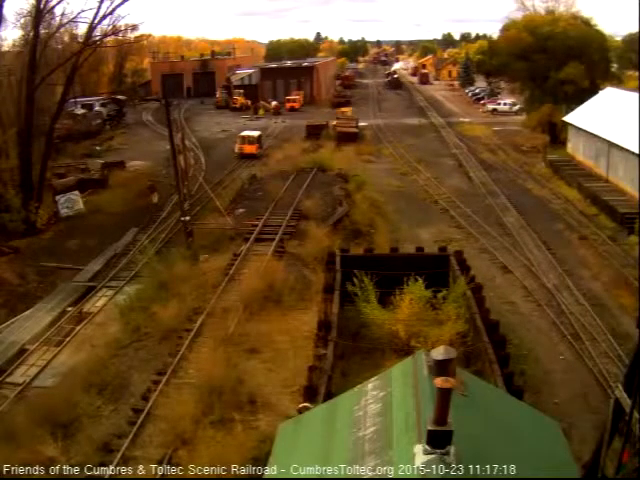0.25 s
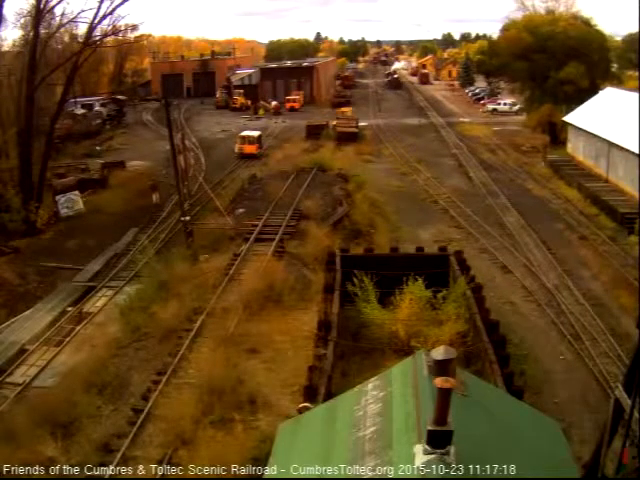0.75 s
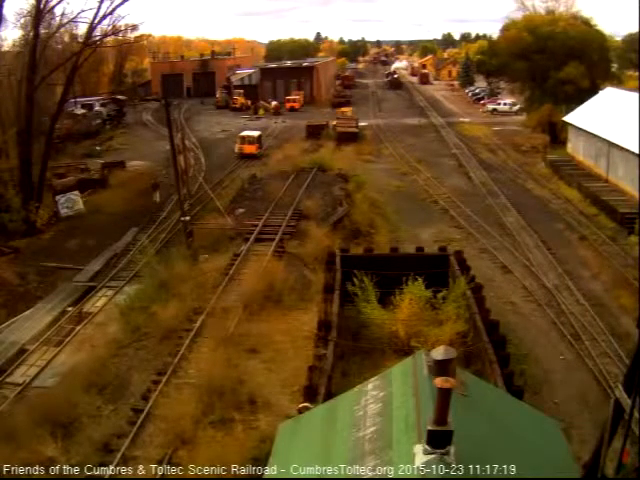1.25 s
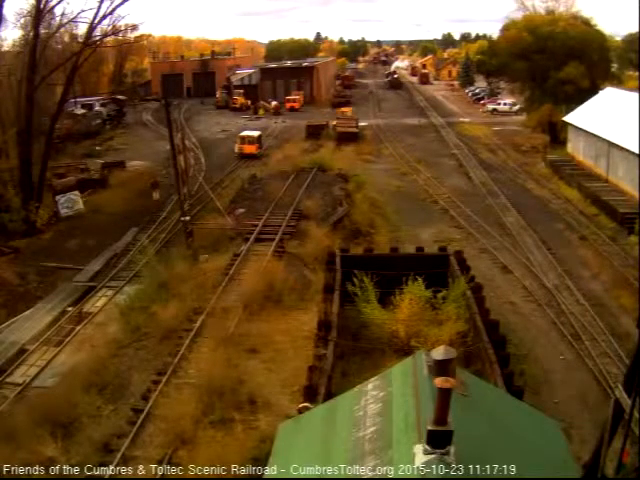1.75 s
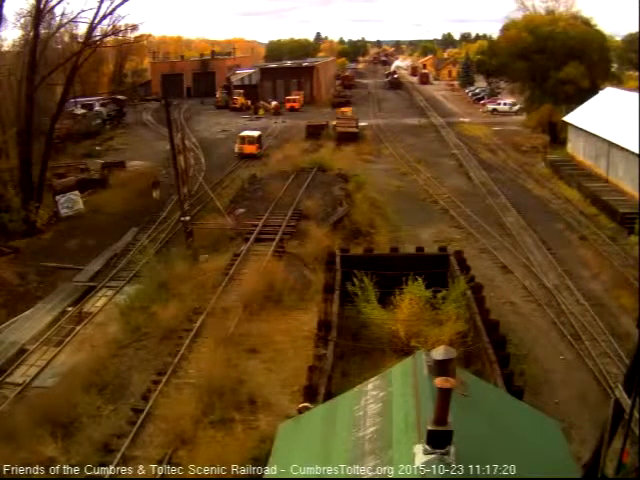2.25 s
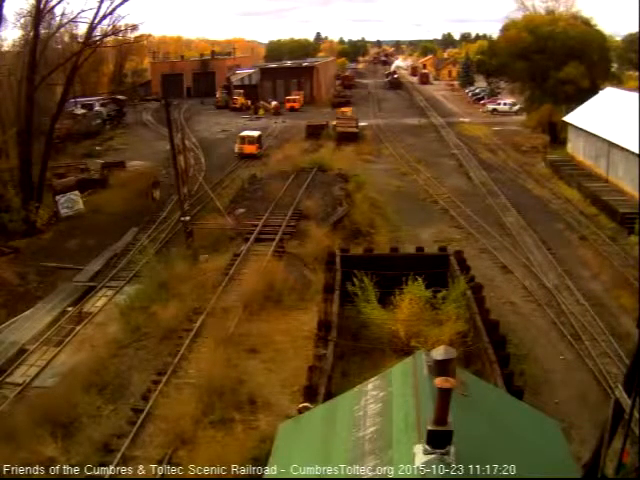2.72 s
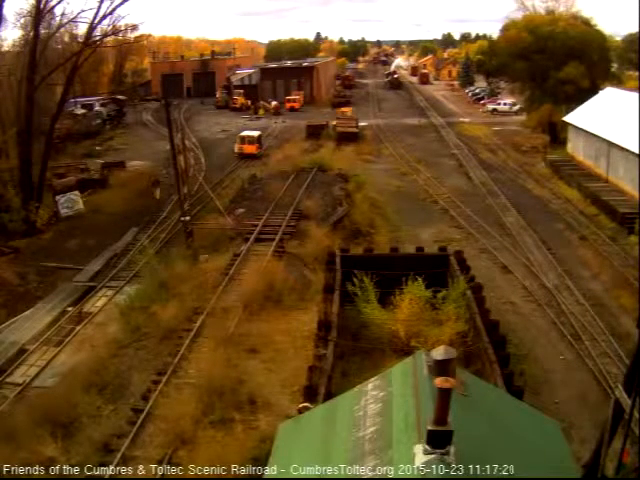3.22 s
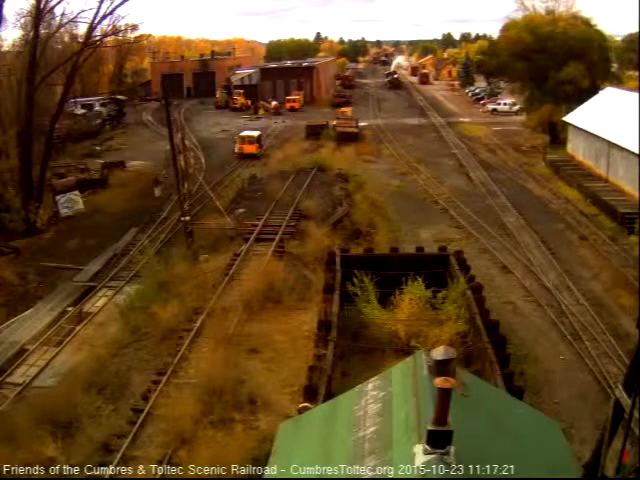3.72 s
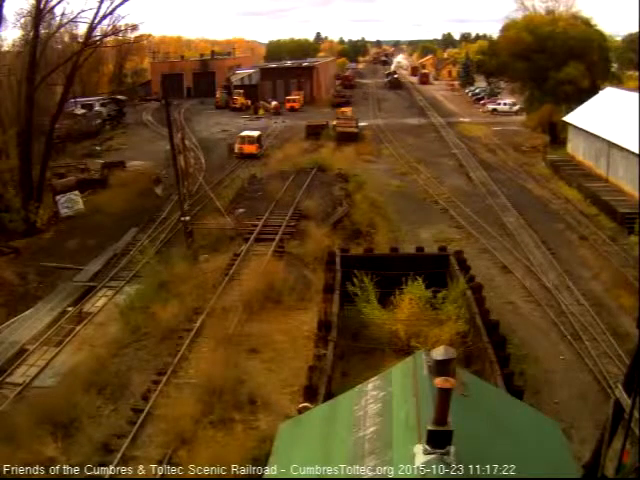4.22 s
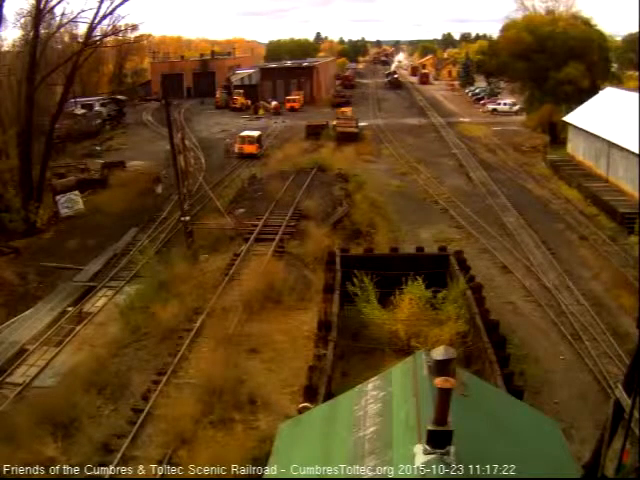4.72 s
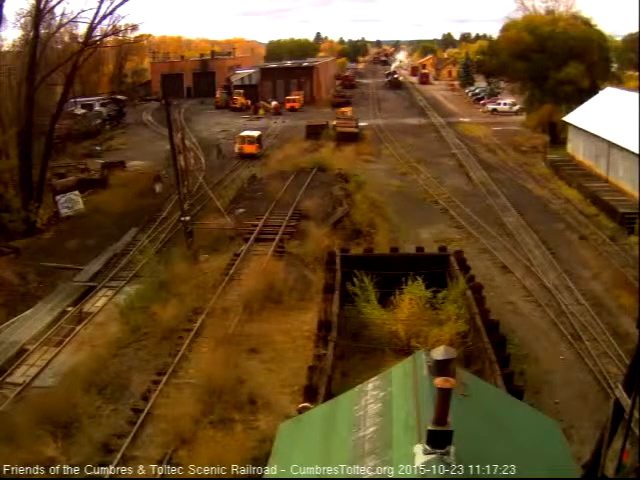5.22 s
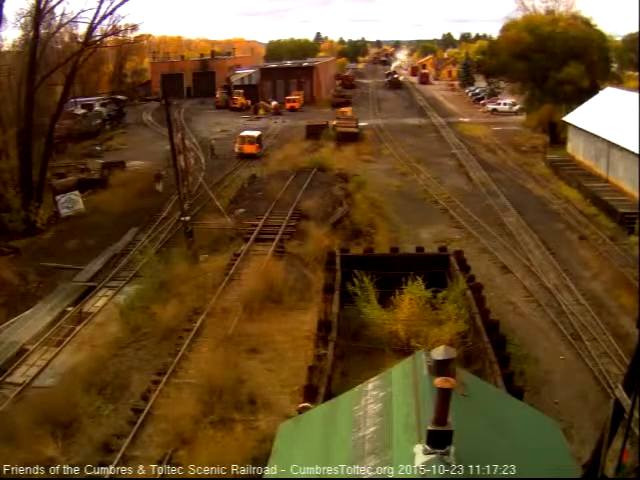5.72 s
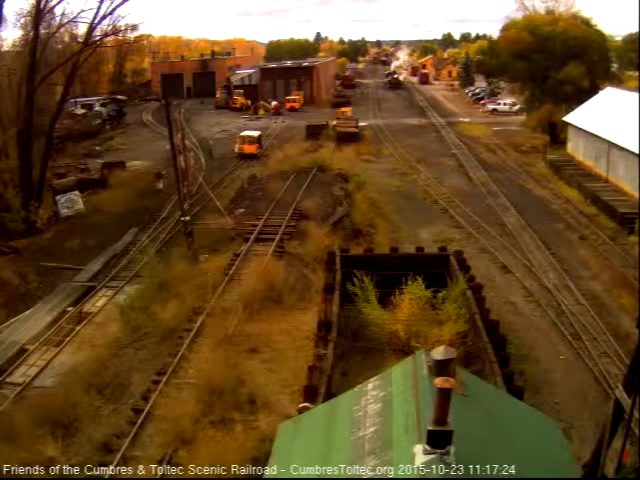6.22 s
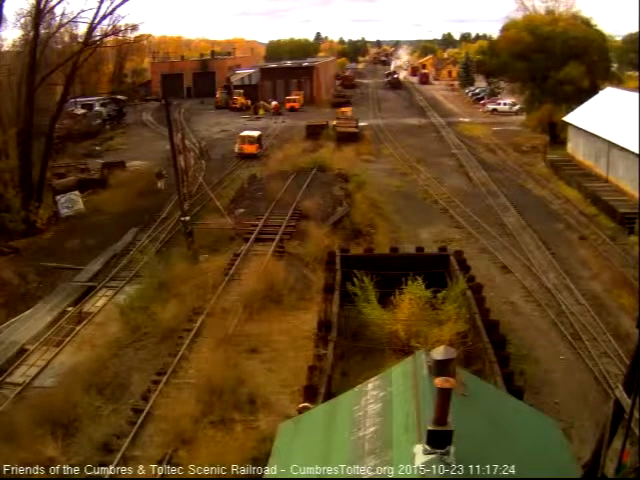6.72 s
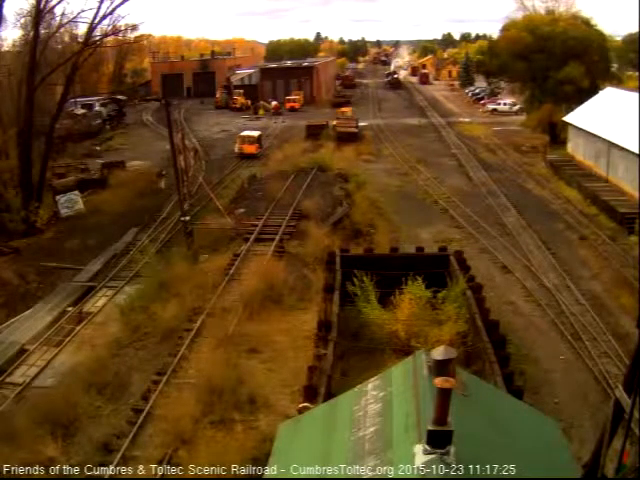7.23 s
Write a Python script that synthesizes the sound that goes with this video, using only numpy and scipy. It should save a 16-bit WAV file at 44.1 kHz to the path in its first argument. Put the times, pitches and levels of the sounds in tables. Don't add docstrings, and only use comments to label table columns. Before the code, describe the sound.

A steam locomotive works across a railway yard, heard from far off. Soft, gusty chuffs come about three per second over an unbroken steam hiss. They strengthen over the first few seconds, stay firm through the middle, then soften and dull a little. A faint turbine whine and low wind rumble sit underneath. The small outdoor microphone is thin and bright, with slightly gritty, watery compression and short echoes from buildings.

```python
import sys
import numpy as np
from scipy import signal
from scipy.fft import rfft, irfft, next_fast_len
from scipy.io import wavfile

SR = 44100
rng = np.random.default_rng(int(sys.argv[2]) if len(sys.argv) > 2 else 0)


def to_linear_factor(level_db):
    exponent = np.asarray(level_db, float) / 20
    return 10 ** exponent


def log_audio(samples):
    frames = np.atleast_2d(samples).T
    limited = np.clip(frames, -1, 1)
    pcm = np.round(limited * 32767).astype(np.int16)
    wavfile.write(sys.argv[1], SR, pcm)


N = 328986

# (time [s], level [dB])
STEAM_PRESSURE = [(0.0, -48), (0.44, -47), (1.0, -45), (1.2, -44.5), (2.37, -42.5), (2.74, -43),
                  (2.93, -42), (3.37, -43), (4.38, -39), (5.11, -40), (7.1, -41), (7.46, -41)]
# (frequency [Hz], density [dB per Hz])
HISS_SPECTRUM = [(710, -49), (1200, -21), (1620, -15.5), (1900, -10.5), (2210, -6), (2760, 0.5), (3000, -1),
                 (3360, 1), (3780, -4), (4210, -8), (4450, -16.5), (5100, -22), (6000, -41), (8000, -81)]
# (frequency [Hz], density [dB per Hz])
ROAR_SPECTRUM = [(110, -41), (150, -13), (274, -11.5), (497, -12.5), (586, -17.5), (731, -11), (968, -8),
                 (1130, -12.5), (1360, -10.5), (1800, -5), (2340, -31.5)]
# (frequency [Hz], density [dB per Hz])
SIZZLE_SPECTRUM = [(4400, -12), (5300, 0), (6000, -1), (6700, 0), (7300, -3), (8100, -10), (9100, -24.5),
                   (10000, -28.5), (13000, -34.5)]
# (time [s], level [dB], rise [s], fall [s], pitch [Hz])
GLAND_SPURT = (0.7, -52.5, 0.06, 0.02, 3220.5)
HISS_DB = -1.42
ROAR_DB, ROAR_FOLLOWS, ROAR_WANDER_DB = -63.5, .25, 1.5
SIZZLE_DB, SIZZLE_FOLLOWS, SIZZLE_LOSS_DB_PER_S = -62, 1.35, 1.027

# (time [s], speed [turns per s])
SHAFT_SPEED = [(0, 57.2), (1.9, 57.1), (4.34, 56.68), (7.46, 56.27)]
# (multiple of the shaft rate [1], level against the blade whine [dB])
SHAFT_ORDERS = [(5, -25), (17, -21), (26, -18), (27, -15), (29, -12), (37, -9), (38, -8), (39, -4),
                (40, -5), (45, -3), (46, -3), (47, 1), (49, -1), (50, -5), (59, -1), (60, 2), (65, -6),
                (66, -7), (68, -5), (71, -8), (72, 0), (74, -14), (82, -22), (144, -43)]
# (time [s], level [dB])
WHINE_LEVEL = [(0, -58.5), (3.2, -62), (3.6, -57.5), (7.46, -58.5)]
BLADES, CASING_EARLY_DB, CASING_FULL_S = 72, -5, 2.5

# (time [s], level [dB])
GUSTS = [
    (0.0, -81.5),
    (0.06, -75),
    (2.06, -70),
    (4.26, -74),
    (4.61, -64),
    (4.67, -72),
    (7.46, -74),
]
# (frequency [Hz], density [dB per Hz])
WIND_SPECTRUM = [(11, -10.5), (18, 0), (38, 3), (60, 2), (73, -2), (90, -13), (115, -20), (170, -31)]
LUMP_DB, LUMPS_PER_S = 1.5, 2.5

# (time of the peak [s], blast [dB], valve opening [s], jet pitch [Hz])
BEATS = [(0.157, -46, 0.0388, 2784), (0.456, -44, 0.0425, 2105), (0.775, -45.5, 0.0392, 2112),
         (1.133, -43.5, 0.0435, 2634), (1.467, -39.5, 0.0462, 2533), (1.783, -39, 0.0374, 2640),
         (2.064, -34, 0.013, 2584), (2.423, -37.5, 0.0351, 2636), (2.76, -35, 0.0353, 2690),
         (3.066, -35, 0.036, 2500), (3.35, -31.5, 0.0184, 2120), (3.689, -35.5, 0.0315, 2583),
         (4.011, -33, 0.0176, 2700), (4.32, -33.5, 0.0298, 2683), (4.59, -32.5, 0.0216, 2614),
         (4.922, -34, 0.0247, 2460), (5.238, -33.5, 0.026, 2400), (5.543, -34.5, 0.0358, 2580),
         (5.814, -34, 0.0286, 2620), (6.137, -36, 0.0295, 1902), (6.445, -35.5, 0.0247, 1797),
         (6.731, -38.5, 0.0395, 1740), (7.003, -36.5, 0.0194, 1755), (7.332, -39, 0.0321, 1936)]
# (frequency [Hz], density [dB per Hz])
BLAST_SPECTRUM = [(500, -45), (800, -22), (1160, -15.5), (1570, -7.5), (2100, -4), (2610, -2), (3410, -3.5),
                  (4170, -13), (4600, -19.5), (5200, -28), (7000, -37), (9000, -66), (13000, -80)]
# (frequency [Hz], width [Hz], level [dB])
CHIMNEY_MODES = [(184.1, 50, -7.5), (270.7, 53, -1), (354.76, 60, -5), (500.4, 90, -7.5), (724.9, 70, -3),
                 (854.7, 40, -1), (1014.9, 70, 2)]
FULL_BLAST_DB = -34
FALL_S, FALL_S_PER_DB = .037, 0.0009
BOOM_DB, BOOM_FOLLOWS, NEAR_CYLINDER_DB = -52, .7, 0.78
BOOM_LOSS_DB_PER_S = 0.658
TONE_LEAD_S = .012

# (delay [s], level [dB])
ECHOES = [
    (.058, -13),
    (.11, -18.5),
    (.17, -16.5),
]

STARVED = [(8, 1), (17, 1), (20, 1), (26, 1), (33, 1), (45, 1), (57, 1), (66, 1), (80, 2), (90, 1), (94, 1),
           (100, 1), (140, 1), (150, 1), (156, 1), (172, 1), (191, 1), (210, 1), (224, 1), (227, 1),
           (233, 1), (252, 2), (256, 2), (275, 3), (289, 1), (299, 1), (304, 2), (310, 3), (330, 1),
           (345, 1)]
LEAN = [29, 50, 61, 64, 98, 137, 142, 177, 197, 218, 231, 239, 243, 259, 291, 295]
# (frequency [Hz], step against the loudest line [dB])
COARSE_STEP = [(40, -27), (300, -9), (1000, -13), (3000, -9), (4600, -13.5), (6800, -18.5), (7200, -5),
               (13000, -8)]
# (frequency [Hz], step against the band's own level [dB])
USUAL_STEP = [(40, -9), (600, -1), (1000, 4), (2500, 0.85), (4000, 1.5), (6000, 6), (13000, 7)]
LEAN_DB = -1
FRAME, FIRST_CENTRE = 941, 353


def rms_one(x):
    return x / np.sqrt(np.mean(x ** 2) + 1e-20)


def in_time(rows):
    s, *columns = np.transpose(rows)
    return [np.interp(np.arange(N) / SR, s, c) for c in columns]


def at_hz(points, hz):
    hz_db = np.array(points)
    return np.interp(np.log(hz), np.log(hz_db[:, 0]), hz_db[:, 1])


def drift(rate):
    r = np.exp(-40 * np.pi * rate / SR)
    slow = signal.lfilter([1], [1, -2 * r, r * r], rng.standard_normal(N // 20 + 2002))[2000:]
    return np.interp(np.arange(N) / 20, np.arange(len(slow)), rms_one(slow - slow.mean()))


def resonance(x, hz, width_hz):
    r = np.exp(-np.pi * width_hz / SR)
    poles = [1, -2 * r * np.cos(2 * np.pi * hz / SR), r * r]
    return signal.lfilter([(1 - r * r) / 2, 0, (r * r - 1) / 2], poles, x)


def turbulence(spectrum, patchy_db, rate):
    size = next_fast_len(N)
    hz = np.arange(1, size // 2 + 2) * SR / size
    shaped = rfft(rng.standard_normal(size)) * to_linear_factor(at_hz(spectrum, hz))
    out, together = 0, drift(rate)
    for centre in np.arange(np.log2(spectrum[0][0]), np.log2(spectrum[-1][0]) + .5, .5):
        share = np.clip(1 - 2 * abs(np.log2(hz) - centre), 0, 1)
        flicker_db = patchy_db * (0.77 * together + drift(rate))
        out = out + irfft(shaped * share, size)[:N] * to_linear_factor(flicker_db)
    return rms_one(out)


def puff(t, rise_s, fall_s):
    emptying = 0.74 * np.exp(-(t / fall_s) ** 2) + .25 * np.exp(-abs(t) / (1.6 * fall_s))
    return np.where(t < 0, np.exp(-(t / rise_s) ** 2), emptying)


def steam():
    t = np.arange(N) / SR
    pressure_db, = in_time(STEAM_PRESSURE)
    swing_db = pressure_db - pressure_db.mean()
    hiss = turbulence(HISS_SPECTRUM, patchy_db=0.6479, rate=9)
    s, db, rise_s, fall_s, hz = GLAND_SPURT
    whistle = rms_one(resonance(resonance(hiss, hz, 90), hz, 180))
    spurt = to_linear_factor(db) * puff(t - s, rise_s, fall_s) * whistle
    roar = turbulence(ROAR_SPECTRUM, patchy_db=1.65, rate=7)
    sizzle = turbulence(SIZZLE_SPECTRUM, patchy_db=1.3, rate=7.3)
    roar_db = ROAR_DB + ROAR_FOLLOWS * swing_db + ROAR_WANDER_DB * drift(2.5)
    sizzle_db = SIZZLE_DB + SIZZLE_FOLLOWS * swing_db - SIZZLE_LOSS_DB_PER_S * t
    return to_linear_factor(pressure_db + HISS_DB) * hiss + to_linear_factor(roar_db) * roar + to_linear_factor(sizzle_db) * sizzle + spurt


def dynamo():
    t = np.arange(N) / SR
    turns_per_s, = in_time(SHAFT_SPEED)
    whine_db, = in_time(WHINE_LEVEL)
    unsteady = np.interp(t, [0, 3.2, 3.5], [.0015, .002, .0003])
    angle = 2 * np.pi * np.cumsum(turns_per_s * (1 + unsteady * drift(6))) / SR
    casing_db = np.interp(t, [0, CASING_FULL_S], [CASING_EARLY_DB, 0])
    tones = np.zeros(N)
    for order, db in SHAFT_ORDERS:
        tone_db = db + casing_db * (order != BLADES) + 1.8 * drift(4)
        tones += to_linear_factor(tone_db) * np.sin(order * angle + rng.uniform(0, 2 * np.pi))
    return to_linear_factor(whine_db + 5.0) * tones


def wind():
    gust_db = in_time(GUSTS)[0] + 1.04 + LUMP_DB * drift(LUMPS_PER_S)
    return to_linear_factor(gust_db) * turbulence(WIND_SPECTRUM, patchy_db=0.5, rate=4.3)


def exhaust():
    jet = turbulence(BLAST_SPECTRUM, patchy_db=1.8336, rate=29) * to_linear_factor(1.6 * drift(130))
    white = rng.standard_normal(N)
    modes = np.array([to_linear_factor(db) * resonance(resonance(white, hz, width), hz, 2 * width)
                      for hz, width, db in CHIMNEY_MODES])
    modes = modes / np.std(modes.sum(0))
    struck = to_linear_factor(rng.normal(0, 1.8, (len(BEATS), len(CHIMNEY_MODES))))
    out = np.zeros(N)
    for k, ((s, blast_db, rise_s, jet_hz), strengths) in enumerate(zip(BEATS, struck)):
        fall_s = FALL_S + FALL_S_PER_DB * (FULL_BLAST_DB - blast_db)
        boom_db = BOOM_DB + BOOM_FOLLOWS * (blast_db - FULL_BLAST_DB)
        boom_db += NEAR_CYLINDER_DB * (-1) ** k - BOOM_LOSS_DB_PER_S * s
        near = slice(max(round((s - .15) * SR), 0), min(round((s + .4) * SR), N))
        t = np.arange(near.start, near.stop) / SR - s
        swell = puff(t, 1.3 * rise_s, .97 * fall_s)
        tone = puff(t + TONE_LEAD_S, rise_s, fall_s) * resonance(jet[near], jet_hz, 350)
        coloured = swell * jet[near] + .9 * tone
        even = np.sqrt(np.sum(swell ** 2) / np.sum(coloured ** 2))
        out[near] += to_linear_factor(blast_db + 0.82) * coloured * even
        boom = puff(t - .002, 1.5 * rise_s, 1.6 * fall_s) * (strengths @ modes[:, near])
        out[near] += to_linear_factor(boom_db) * boom
    return out


def yard(x):
    dull = signal.sosfilt(signal.butter(1, 2500, fs=SR, output="sos"), x)
    return x + sum(to_linear_factor(db) * np.pad(dull, (round(s * SR), 0))[:N] for s, db in ECHOES)


def scene():
    return (steam() + dynamo() + wind() + yard(exhaust()))[None]


def starve(x):
    n, k = np.arange(2 * FRAME) + .5, np.arange(560) + .5
    basis = np.sin(np.pi * n / (2 * FRAME)) * np.cos(np.pi / FRAME * np.outer(k, n + FRAME / 2))
    count, hz = N // FRAME + 3, k * SR / (2 * FRAME)
    padded = np.pad(x, (2 * FRAME - FIRST_CENTRE, 3 * FRAME), mode="reflect")
    halves = padded[:(count + 1) * FRAME].reshape(-1, FRAME)
    lines = np.hstack([halves[:-1], halves[1:]]) @ basis.T
    band_rms = np.sqrt((lines ** 2).reshape(count, -1, 14).mean(axis=2))
    step = np.repeat(band_rms, 14, axis=1) * to_linear_factor(at_hz(USUAL_STEP, hz)) + 1e-12
    listed = [first + 1 + i for first, length in STARVED for i in range(length)]
    starved = np.r_[listed, np.add(LEAN, 1)]
    by_band_db = 2.5 * np.repeat(rng.standard_normal(size=(len(starved), 40)), repeats=14, axis=1)
    lean_db = LEAN_DB * np.isin(starved - 1, LEAN)[:, None]
    loudest = np.percentile(abs(lines[starved]), 98, axis=1)[:, None]
    step[starved] = loudest * to_linear_factor(at_hz(COARSE_STEP, hz) + by_band_db + lean_db)
    rounded = np.sign(lines) * step * np.floor(abs(lines) / step + .4)
    frames = rounded @ basis * 2 / FRAME
    joined = frames[1:, :FRAME] + frames[:-1, FRAME:]
    return joined.ravel()[FRAME - FIRST_CENTRE:][:N]


def band_limit(x):
    return signal.sosfilt(signal.butter(12, 12750, fs=SR, output="sos"), x)


def record(dry):
    floor = to_linear_factor(-101) * rng.standard_normal(N)
    closing = np.clip((N - np.arange(N)) / 25, 0, 1)
    mix = starve(dry[0]) * closing + floor
    return band_limit(mix[None])


dry = scene()
out = record(dry)
log_audio(out)
```